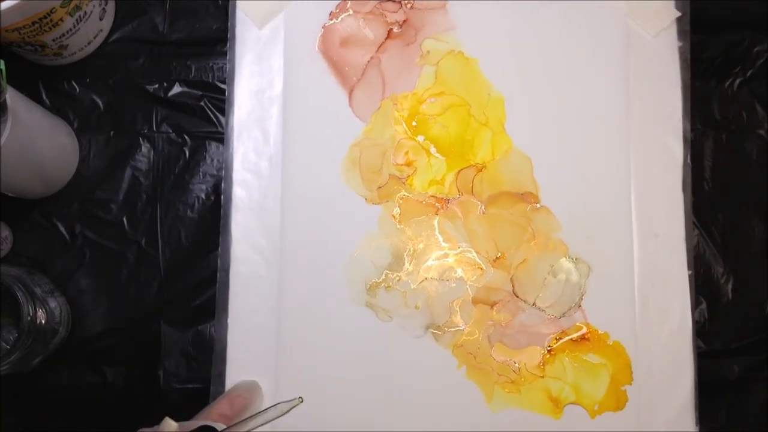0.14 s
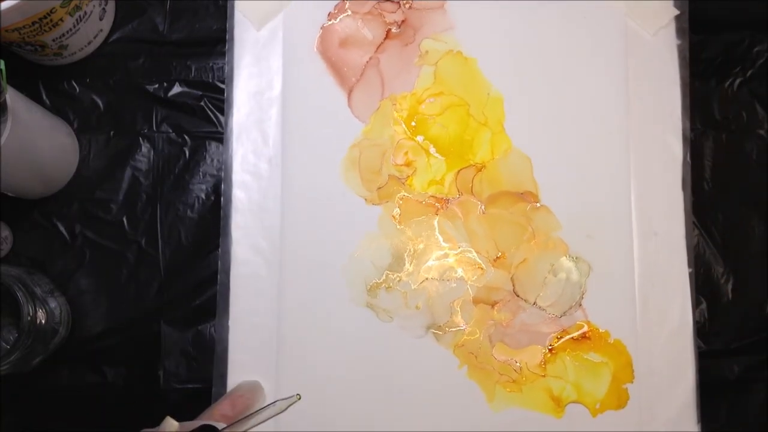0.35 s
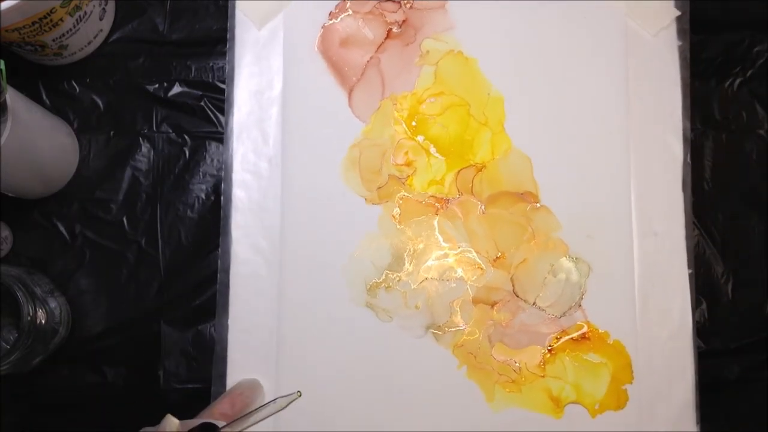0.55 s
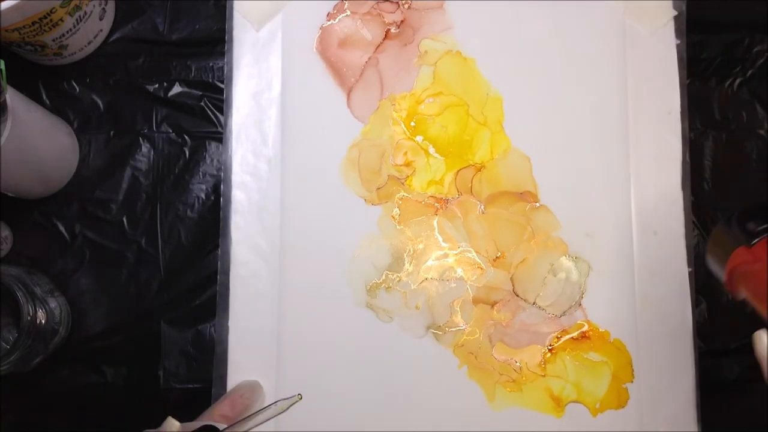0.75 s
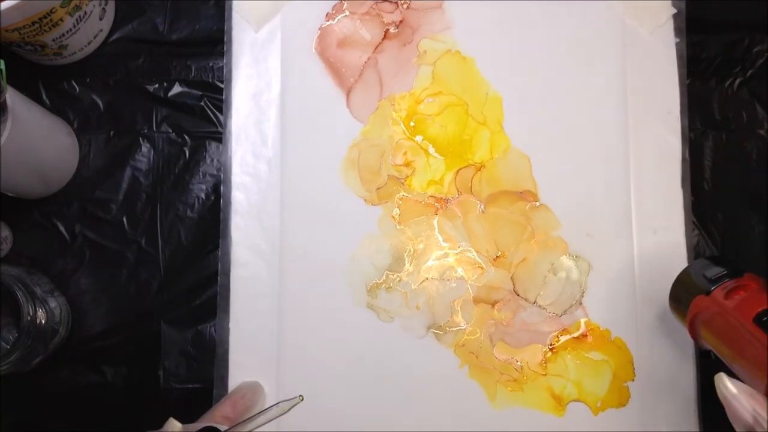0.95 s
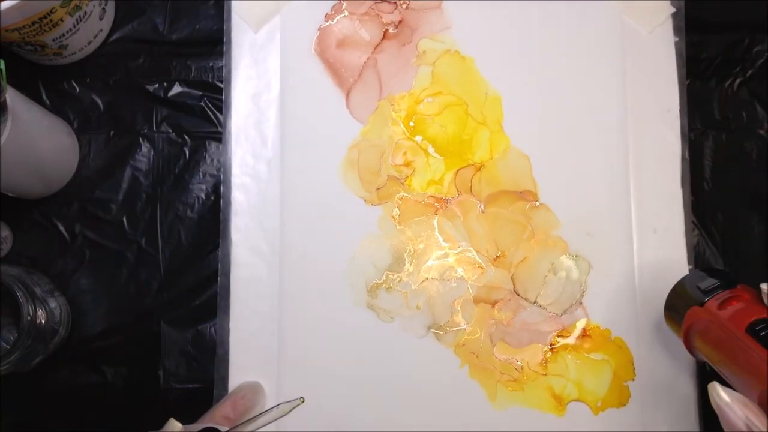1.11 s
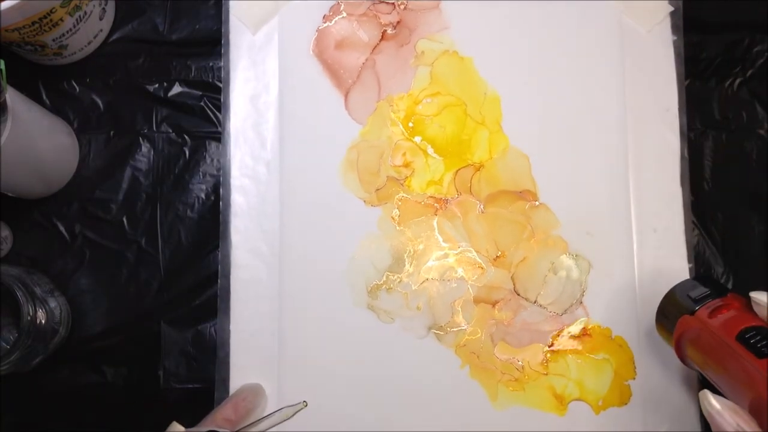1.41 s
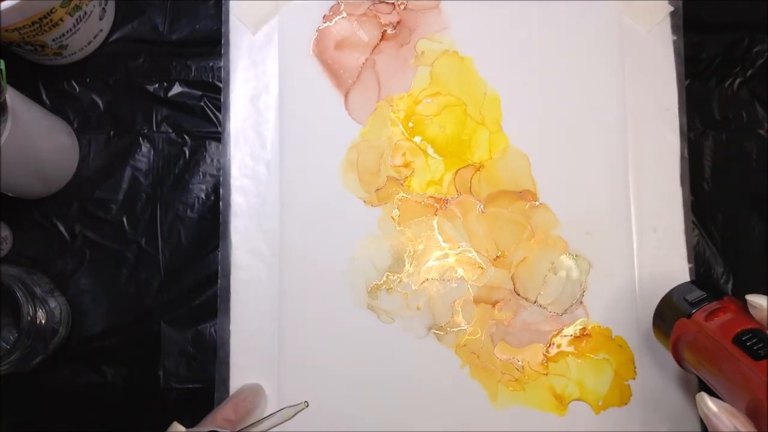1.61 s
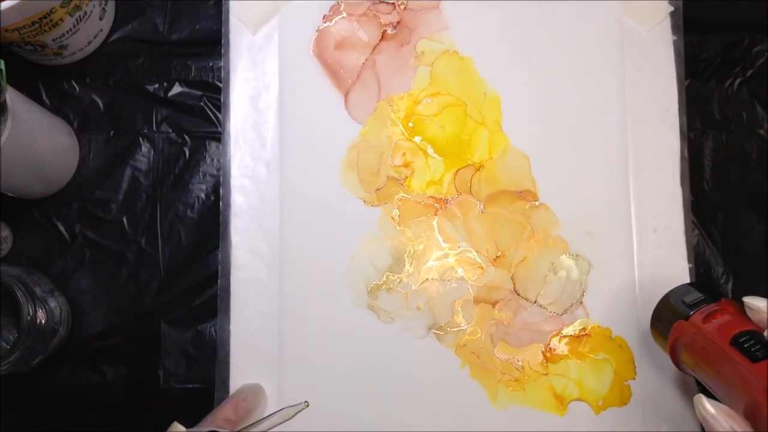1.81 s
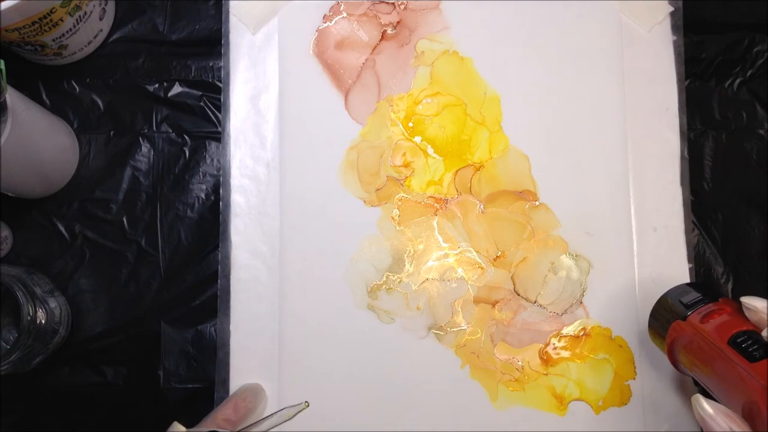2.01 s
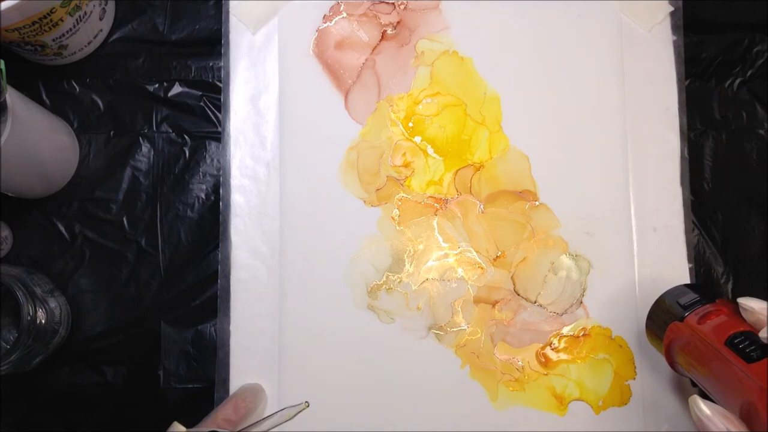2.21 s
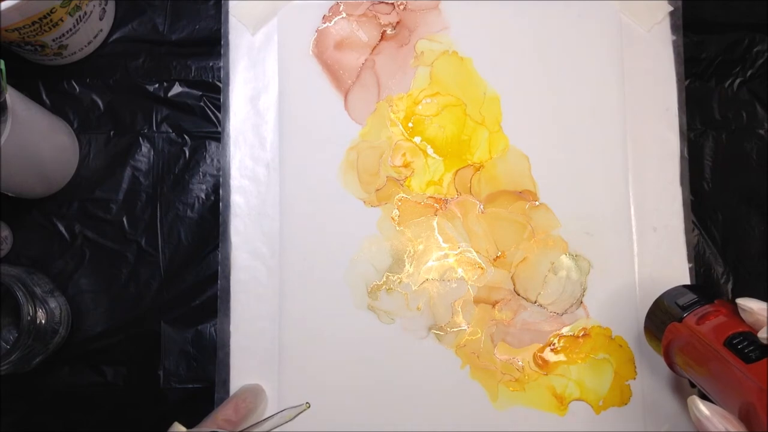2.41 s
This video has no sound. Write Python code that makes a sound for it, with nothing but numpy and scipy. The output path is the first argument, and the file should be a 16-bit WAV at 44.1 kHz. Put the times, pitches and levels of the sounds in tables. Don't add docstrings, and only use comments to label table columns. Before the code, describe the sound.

Small blow dryer hissing continuously indoors, thin whine on top, tone shifting as it turns toward paper

```python
import sys
import numpy as np
from scipy import signal
from scipy.fft import rfft, irfft
from scipy.io import wavfile
from scipy.ndimage import uniform_filter1d

SR = 44100
rng = np.random.default_rng(int(sys.argv[2]) if len(sys.argv) > 2 else 0)


def to_wav(sig):
    pcm = np.clip(np.atleast_2d(sig), -1, 1) * 32767
    pcm = np.round(pcm).astype(np.int16)
    wavfile.write(sys.argv[1], SR, pcm.T)


def ratio(d):
    e = np.asarray(d, float) / 20
    return 10 ** e


N = 112454
TIME = np.arange(N) / SR


def rms_one(x):
    return x / np.sqrt(np.mean(x ** 2) + 1e-20)


def drift(rate):
    pole = np.exp(-80 * np.pi * rate / SR)
    slow = signal.lfilter([1], [1, -2 * pole, pole ** 2], rng.standard_normal(N // 40 + 2002))[2000:]
    return np.interp(np.arange(N) / 40, np.arange(len(slow)), rms_one(slow - slow.mean()))


def resonance(x, hz, width):
    pole = np.exp(-np.pi * width / SR)
    return signal.lfilter([1 - pole, 0, pole - 1], [1, -2 * pole * np.cos(2 * np.pi * hz / SR), pole ** 2], x)


# time in seconds, pose (0 held away, 1 swinging in, 2 aimed at the paper),
# change of the barrel mouth's ring in dB.
SWING = [
    (0, 0.53, -0.1),
    (.3, 0.01, 0),
    (.45, 0.42, -0.7),
    (.62, 0.81, 2),
    (.76, 1.51, -1),
    (.87, 1.7, -4.5),
    (1.0, 1.82, 0),
    (1.12, 1.77, -1.5),
    (1.3, 1.91, -0.3),
    (2.55, 1.95, 2),
]


def pose(column=1):
    swing = np.array(SWING)
    return np.interp(TIME, swing[:, 0], swing[:, column])


FLUTTER_EDGES = [0, 700, 1500, 2200, 3200, 4600, 6500, 9000, 12000, 22050]


def turbulence():
    flutter_db, flutter_per_s = 0.5, 22
    gust_db, gust_per_s = 0.08, 0.69
    hz = np.maximum(np.fft.rfftfreq(N, 1 / SR), 1)
    white = rfft(rng.standard_normal(N))
    air_flow = np.zeros(N)
    for low, high in zip(FLUTTER_EDGES, FLUTTER_EDGES[1:]):
        band = irfft(white * (hz >= low) * (hz < high), N)
        air_flow += ratio(flutter_db * drift(flutter_per_s)) * band
    return rfft(air_flow * ratio(gust_db * drift(gust_per_s)))


def room():
    echo_db, fade_60db_s, gap_s = -10.5, 0.2, 0.0037
    t = np.arange(SR // 2) / SR
    tail = rng.standard_normal(len(t)) * ratio(-60 * t / fade_60db_s) * (t > gap_s)
    return 1 + ratio(echo_db) * rfft(tail / np.sqrt(np.sum(tail ** 2)), N)


# frequency in Hz, level in dB.
AIR_COLOUR = [(30, -55), (90, -47), (150, -33.5), (210, -16.5), (420, -3.5), (1000, 1.5), (4000, 1.54),
              (15000, -0.44)]
# frequency in Hz, width in Hz,
# then the boost in dB when held away, swinging in, and aimed.
BARREL_RINGS = [(275, 40, 2, -9.5, 2.5), (521, 108, -4.5, 3, 7.5), (623, 137, -6.5, -15, -9.5),
                (864, 34, 0, -2.5, -12), (730, 57, 0.5, 4, -4.5), (1288.5, 157, 4.5, 11.5, 5.5),
                (1737, 96, 5.5, 5.5, -3), (1978, 115, 1, 2.5, -7.5), (2295, 250, 3.5, -4.5, 6.5),
                (2512, 231, 10.5, 5.5, 8.5), (2742.5, 241, 12, 12.5, 11.5), (3190, 410, 0.5, 8.5, -0.2),
                (4040, 800, -1.5, 4, -0.5), (4200, 120, -2.5, -3, 2), (4540, 350, -4, -6.5, 0),
                (5390, 210, 1, 5, 2)]
# frequency in Hz, width in Hz,
# then the boost in dB when held away, swinging in, and aimed.
TABLE_AND_HAND = [(3305, 170, -6, 1.5, -11), (6000, 380, 4.5, 1.5, -1.1), (3625, 110, 1, 0, -6.5),
                  (5570, 120, -2, -1, -10), (6950, 160, -1, 5, 0.5), (7940, 710, -2, -1, 2.5),
                  (8900, 370, -10, 1.5, -7), (9660, 1330, -5, 2.5, 2.5), (9700, 230, -6, -3, 0.5),
                  (10480, 330, -4, -4.5, 3.5), (11100, 1900, 3.5, 3, 0.9), (11500, 560, 2, -0.5, 0.5),
                  (7440, 510, -2.5, 3.5, 0.5), (13370, 640, -0.5, 3, 3.5), (14400, 1100, 1, -2.5, 3),
                  (15800, 540, -1, 1, 3)]


def air():
    level_db, mouth_hz, mouth_width_hz = -33, 2640, 300
    hz = np.maximum(np.fft.rfftfreq(N, 1 / SR), 1)
    broad = np.interp(np.log(hz), np.log(np.array(AIR_COLOUR)[:, 0]), np.array(AIR_COLOUR)[:, 1])
    hiss = turbulence()
    blend = np.zeros(N)
    for k in range(3):
        colour_db = broad.copy()
        for table in (BARREL_RINGS, TABLE_AND_HAND):
            for centre, width, *boosts in table:
                colour_db += boosts[k] * np.exp(-(2 * (hz - centre) / width) ** 2 / 2)
        share = np.clip(1 - abs(np.clip(pose(), 0, 2) - k), 0, 1)
        blend += share * irfft(hiss * ratio(colour_db) * room(), N)
    mouth = (ratio(pose(column=2)) - 1) * resonance(blend, mouth_hz, mouth_width_hz)
    return ratio(level_db) * (blend + mouth)


# time in seconds, slot rate in Hz.
MOTOR_SPEED = [
    (0, 496.5),
    (.25, 496.6),
    (.5, 497.3),
    (.8, 497.1),
    (1.1, 496.6),
    (1.45, 496.7),
    (1.75, 496.1),
    (2.0, 495.5),
    (2.55, 495.8),
]
# multiple of the slot rate,
# then the level in dB when held away, swinging in, and aimed.
MOTOR_TONES = [(1, -56, -56, -66), (2, -63, -62, -60), (4, -58, -62, -65), (5, -45, -44, -46),
               (7, -55, -54, -61), (10, -54, -53, -54), (11, -53, -55, -66), (13, -60, -63, -68),
               (14, -58, -60, -57), (15, -55, -48, -59), (8, -57, -56, -66)]


def motor():
    hz = np.interp(TIME, *np.transpose(MOTOR_SPEED)) * (1 + 0.0003 * drift(4.2))
    phase = 2 * np.pi * np.cumsum(hz) / SR
    whine = np.zeros(N)
    for multiple, *pose_db in MOTOR_TONES:
        level = ratio(np.interp(pose(), [0, 1, 2], pose_db) + 1.2 * drift(6.8))
        whine += np.sqrt(2) * level * np.sin(int(multiple) * phase + rng.uniform(0, 2 * np.pi))
    return whine


def fan():
    phase = 2 * np.pi * np.cumsum(1712 * (1 + 0.001 * drift(2.6))) / SR
    level_db = np.interp(pose(), [0, 1.75, 2], (-58, -55, -61))
    return np.sqrt(2) * ratio(level_db + 1.2 * drift(5)) * np.sin(phase)


# frequency in Hz, width in Hz, level in dB.
GRILLE_WHISTLES = [(274, 16, -70), (829, 15, -67), (1713, 30, -61), (3205, 40, -61), (4147, 60, -60),
                   (14007, 40, -61)]


def whistles():
    total = np.zeros(N)
    for hz, width, db in GRILLE_WHISTLES:
        once = resonance(rng.standard_normal(N), hz, width)
        total += ratio(db) * rms_one(resonance(once, hz, width))
    return total


# start in seconds, level in dB.
TABLE_THUMPS = [
    (.49, -78),
    (.58, -78),
    (.68, -89),
    (1.02, -79),
    (1.27, -83),
    (1.65, -83),
    (1.85, -82),
]


def thumps():
    hz, width_hz, fade_60db_s, rise_s = 102, 39, 0.9, 0.0091
    swell = np.zeros(N)
    for start, db in TABLE_THUMPS:
        since = TIME - start
        swell += ratio(db - 60 * np.maximum(since, 0) / fade_60db_s) * np.clip(since / rise_s, 0, 1)
    rumble = resonance(rng.standard_normal(N), hz, width_hz)
    return rms_one(resonance(rumble, hz, width_hz)) * swell


def scene():
    return np.tile(air() + motor() + fan() + whistles() + thumps(), (2, 1))


def lapped(half):
    n = np.arange(2 * half) + 0.5
    k = np.arange(half)[:, None] + 0.5
    fade = np.sin(np.pi * n / (2 * half))
    return np.sqrt(2 / half) * fade * np.cos(np.pi / half * (n + half / 2) * k)


STARVED_TIMES = [
    .4633,
    .4846,
    .7193,
    1.146,
    1.4446,
    1.8073,
    2.5326,
    2.554,
]


def starve(x):
    slice_s = 1024 / 48000
    step_db, step_follows, leftover_db = 13.5, 0.75, -32
    half = int(slice_s * SR)
    basis = lapped(half)
    padded = np.pad(x, 2 * half, "reflect")
    out = padded.copy()
    first = STARVED_TIMES[0]
    for s in STARVED_TIMES:
        i = round(s / slice_s - first / slice_s) * half + int(first * SR) + half
        tones = basis @ padded[i:i + 2 * half]
        local = np.sqrt(uniform_filter1d(tones ** 2, size=48))
        step = ratio(step_db) * local ** step_follows * np.median(local) ** (1 - step_follows)
        step[slice(*(np.array((330, 950)) * 2 * half // SR))] *= 10
        step[slice(*(np.array((140, 310)) * 2 * half // SR))] /= 10
        lost = tones - step * np.round(tones / step)
        out[i:i + 2 * half] -= lost * (1 - ratio(leftover_db)) @ basis
    return out[2 * half:2 * half + N]


# time in seconds, lowest Hz, highest Hz, level in dB.
SPLIT_BANDS = [
    (.628, 4260, 5140, -50),
    (.8835, 9000, 10440, -49),
    (.9996, 4200, 5160, -54),
    (1.882, 11700, 13900, -47),
    (1.882, 14400, 15800, -48),
    (1.905, 9700, 11200, -47),
    (2.439, 4570, 6370, -49),
    (2.439, 6900, 9800, -46),
]


def split_noise():
    side = np.zeros(N)
    hz = np.arange(1024) * SR / 2048
    basis = lapped(1024)
    for s, low_hz, high_hz, db in SPLIT_BANDS:
        i = round(s * SR / 1024) * 1024 + 52 - 1024
        band = rng.standard_normal(1024) * (hz > low_hz) * (hz < high_hz)
        side[i:i + 2048] += ratio(db) * rms_one(band @ basis)
    return side


def roll_off(x):
    return signal.sosfilt(signal.butter(12, 16920, fs=SR, output="sos"), x)


def record(dry):
    top_cut = signal.ellip(14, 0.3, 75, 15730, fs=SR, output="sos")
    mono = signal.sosfilt(top_cut, starve(dry[0]))
    mix = mono + split_noise() * [[1], [-1]]
    return roll_off(mix)


dry = scene()
out = record(dry)
to_wav(out)
```